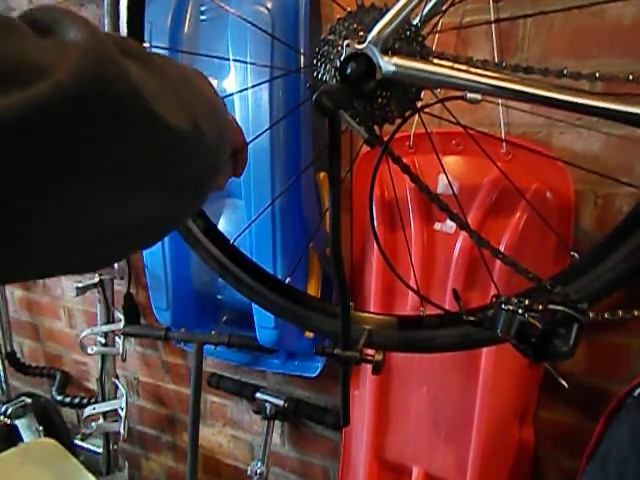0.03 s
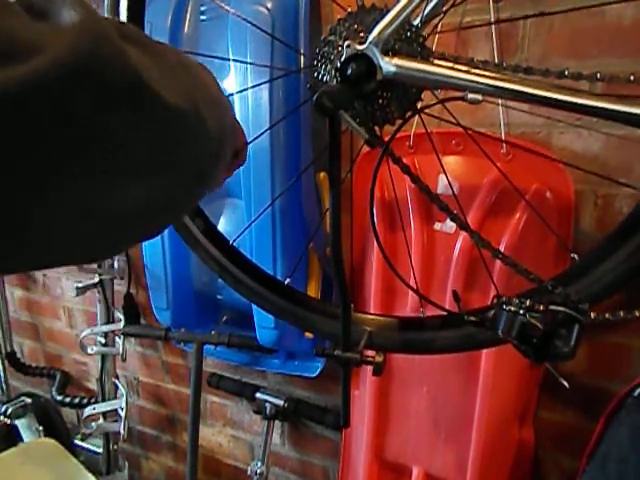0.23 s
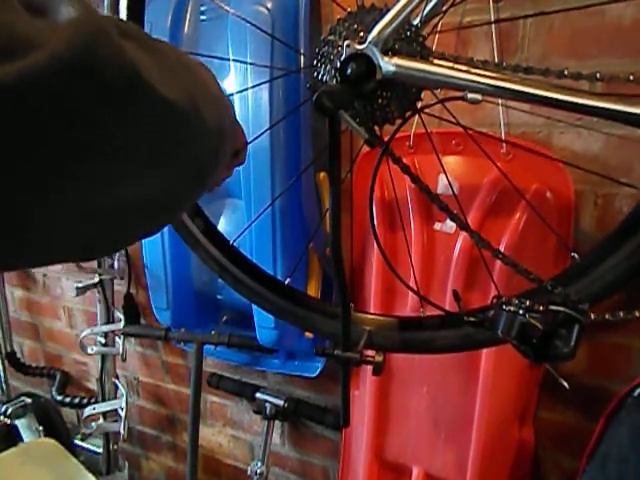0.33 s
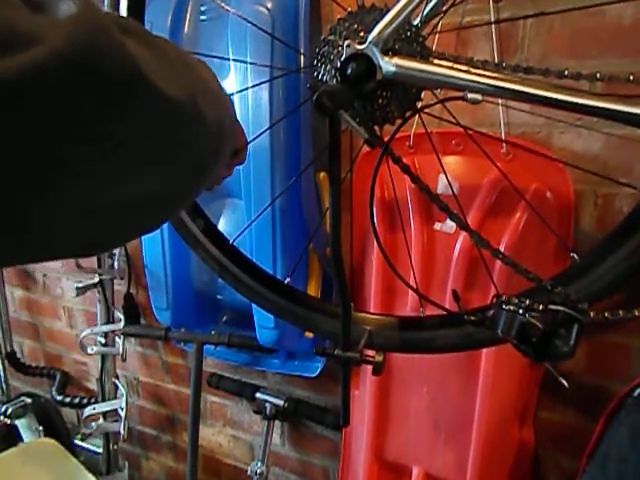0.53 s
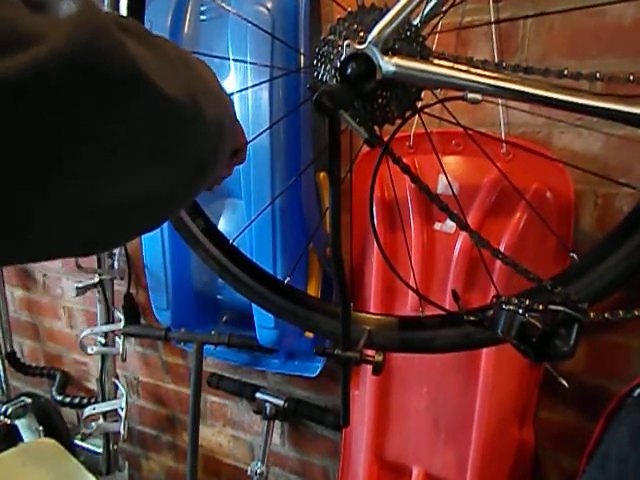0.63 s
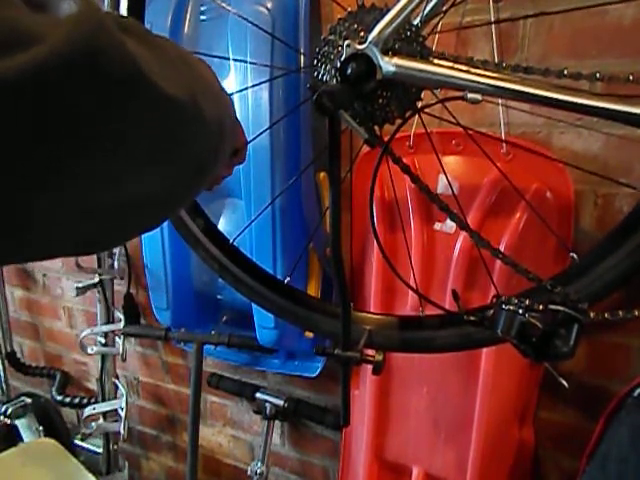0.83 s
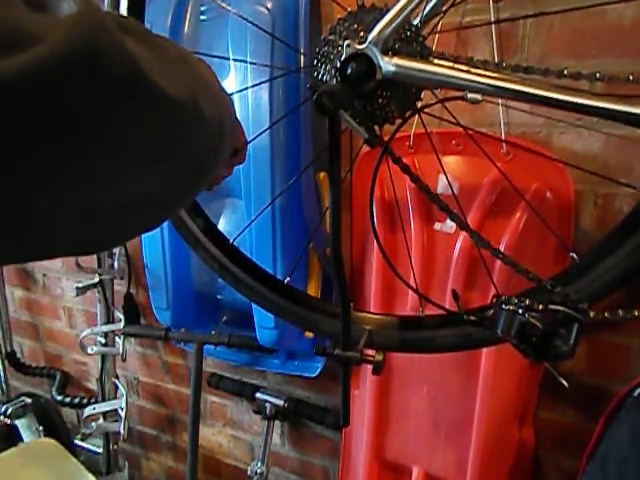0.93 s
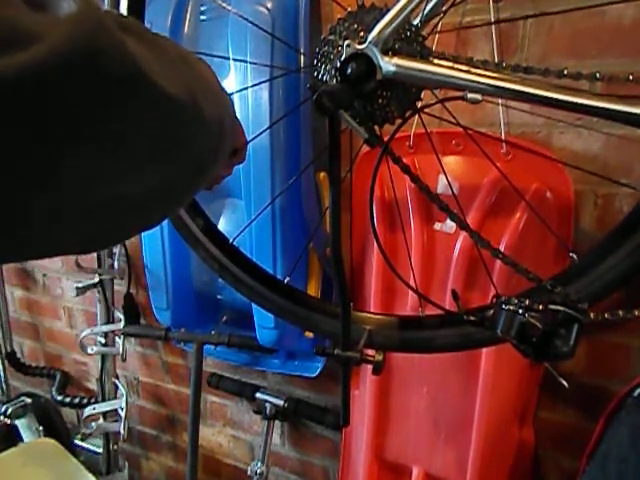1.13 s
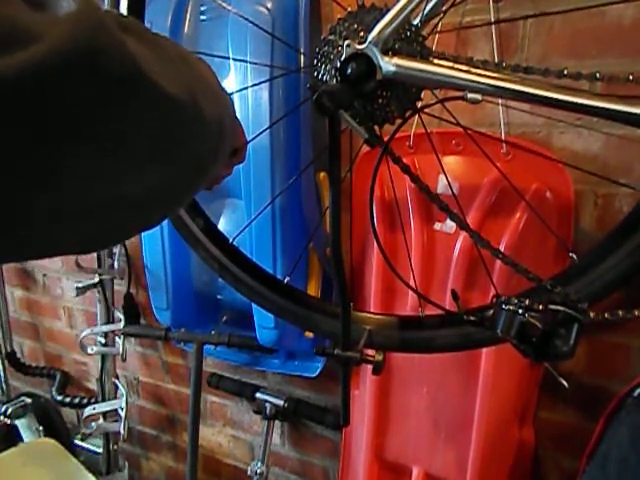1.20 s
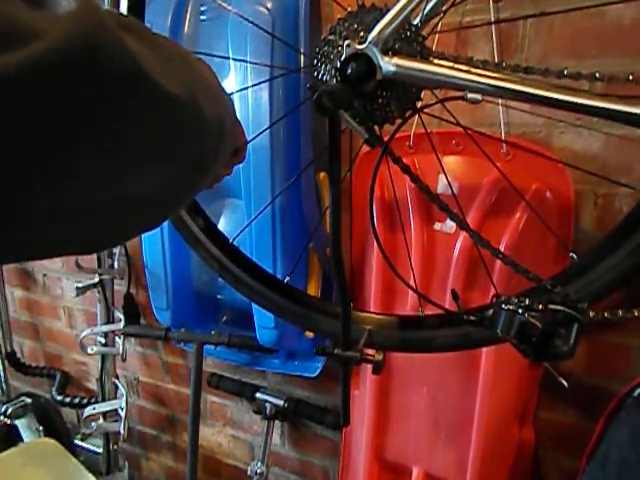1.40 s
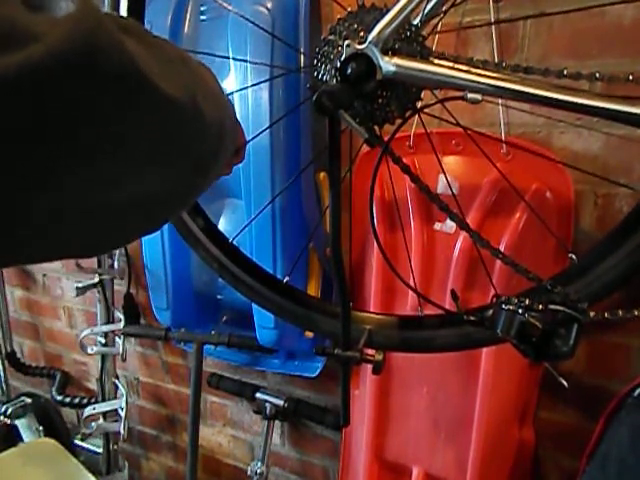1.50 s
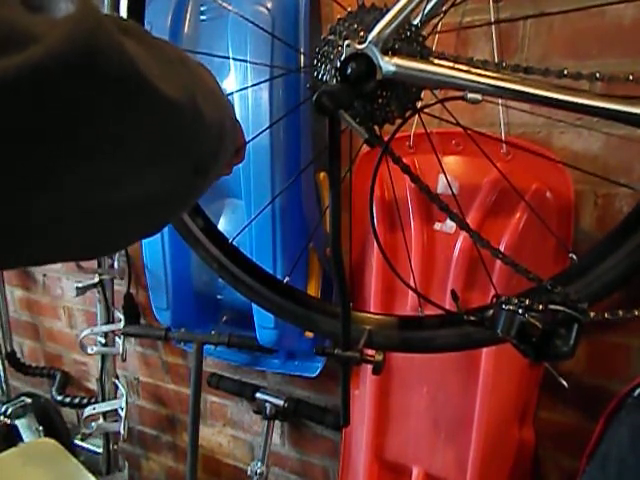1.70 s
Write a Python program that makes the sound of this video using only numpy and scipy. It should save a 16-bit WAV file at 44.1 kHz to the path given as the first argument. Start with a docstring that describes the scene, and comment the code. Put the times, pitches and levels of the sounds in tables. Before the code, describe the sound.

A sharp snap and a softer tick from bicycle wheel spokes in a quiet workshop.

```python
"""In a small brick workshop, bicycle spokes are worked by hand: one hard snap, then a lighter slip.
Each sudden release of stiff steel radiates a crack and short ticks, and excites the wheel's damped modes.
The walls return discrete echoes and a diffuse tail; faint handling rubs swell over a steady hiss.
A narrow-band microphone loses the treble and just overloads on the first snap."""
import sys
import numpy as np
from scipy import signal
from scipy.fft import rfft, irfft
from scipy.io import wavfile

SR = 44100
rng = np.random.default_rng(int(sys.argv[2]) if len(sys.argv) > 2 else 0)


def master(y):
    """Save y as 16-bit WAV."""
    cut = np.clip(np.atleast_2d(y).T, -1, 1)
    pcm = np.round(cut * 32767)  # scale
    wavfile.write(sys.argv[1], SR, pcm.astype(np.int16))


N = 77175


def amp(db):
    """Amplitude ratio of a level in decibels."""
    return 10 ** (np.asarray(db) / 20)


def level_at(spectrum, hz):
    """Level in dB, interpolated on a logarithmic frequency axis."""
    points_hz, db = np.transpose(spectrum)
    return np.interp(np.log(hz + 1), np.log(points_hz + 1), db)


def bins():
    """Frequencies in Hz of a full-length spectrum."""
    return np.fft.rfftfreq(N, 1 / SR)


def since(start):
    """Time in seconds, counted from the start."""
    return np.arange(N) / SR - start


def bell(x):
    """Gaussian curve of height 1."""
    return np.exp(-.5 * x ** 2)


def decay(t, t60):
    """Exponential damping: a fall of 60 dB in t60 seconds."""
    return np.exp(-np.log(1000) * t / t60)


def noise(gain):
    """Spectral shaping: white noise weighted by frequency, then scaled to rms 1."""
    shaped = irfft(rfft(rng.standard_normal(N)) * gain, N)
    return shaped / np.sqrt(np.mean(shaped ** 2) + 1e-20)


# Background spectrum. Each row: frequency in Hz, relative spectral density in dB.
HISS_SPECTRUM = [(20, -10), (60, -8.5), (150, -11), (260, -6.5), (420, -8), (560, -4.5), (880, -1),
                 (1150, -3), (1500, -3), (2400, -6.5), (2900, -5), (3500, -8), (5000, -9), (5500, -16),
                 (6000, -15)]


def hiss(db=-48.5):
    """Stationary noise: room air and the microphone set a steady floor."""
    return amp(db) * noise(amp(level_at(HISS_SPECTRUM, bins())))


# Spectrum of metal slipping on metal. Each row: frequency in Hz, relative level in dB.
CRACK_SPECTRUM = [(200, -14), (700, -11), (1000, -3), (1400, -3.5), (1900, -0.5), (2500, -4), (3300, 3.5),
                  (4500, 11), (6000, 7)]


def crack(start, db, low_hz):
    """Stick-slip release: a brief broadband burst, rolled off below low_hz."""
    t = since(start)
    low_cut = (1 - bell(bins() / low_hz)) ** 2
    burst = noise(amp(level_at(CRACK_SPECTRUM, bins())) * low_cut)
    return amp(db) * burst * (t > 0) * decay(abs(t), t60=0.019)


# The spoke's main band, stressed by a hard snap. Each row: frequency in Hz, gain in dB at full focus.
SNAP_BAND = [(200, -7.5), (900, -5.5), (1900, -6), (2700, -2), (3400, 1.5), (4050, 5), (4600, -3),
             (5400, -9), (6000, -10)]
# Modes of spokes, rim and sprockets. Each row: frequency in Hz, relative level in dB, t60 in seconds.
WHEEL_MODES = [(1395, -15.5, 0.17), (1884, -4.5, .2), (2094, -10.5, 0.57), (2402, -2.5, 0.25),
               (2703, -2, 0.25), (3280, -12, 0.14), (3352, -3.5, 0.2), (3370, -10, 0.36),
               (3805, -5.5, 0.38), (4050, -3, .19), (4220, 1, 0.16), (4500, 3.5, 0.18), (4660, -5.5, .17),
               (5370, -6, 0.22)]


def wheel_ring(start, db, focus):
    """Free vibration: after a click the wheel rings as a sum of damped modes."""
    t = np.maximum(since(start), 0)
    ring = np.zeros(N)
    for (hz, mode_db, t60), phase in zip(WHEEL_MODES, rng.random(len(WHEEL_MODES))):
        gain = amp(mode_db + focus * level_at(SNAP_BAND, hz))
        ring += gain * decay(t, t60) * np.sin(2 * np.pi * (hz * t + phase))
    return amp(db) * ring * (t > 0)


# Spectrum of a light slip. Each row: frequency in Hz, relative level in dB.
SLIP_SPECTRUM = [(200, -49.5), (700, -47), (1100, -21), (1500, -10), (2000, -14), (2600, -3), (3400, -2),
                 (4500, 0), (5200, -5), (6000, -8.5)]


def room_tail(start, db, build_s, t60, focus):
    """Reverberation: dense reflections merge into noise that builds up and dies away."""
    t = np.maximum(since(start), 0)
    colour = amp(level_at(SLIP_SPECTRUM, bins()) + focus * level_at(SNAP_BAND, bins()))
    build_up = 1 - np.exp(-t / build_s)
    return amp(db) * noise(colour) * build_up * decay(t, t60)


def pulse(start, db, hz, half_s):
    """Wave packet: a brief tone under a Gaussian envelope that peaks at start."""
    t = since(start)
    return amp(db) * bell(t / half_s) * np.cos(2 * np.pi * hz * t)


# The knock on the rim. One row: time in seconds, peak level in dB, pitch in Hz.
RIM_KNOCK = (0.2379, -20, 1560)


def rim_knock():
    """Impact: the hard snap jolts the rim into one lower-pitched pulse."""
    return pulse(*RIM_KNOCK, half_s=.0003)


# Direct sound of the spokes. Each row: time in seconds, peak in dB, pitch in Hz, half length in seconds.
SPOKE_TICKS = [(0.2381, -1.5, 4380, 0.00032), (1.1954, -13, 4140, 0.00011), (1.1963, -19, 3650, 0.00017),
               (1.1972, -18, 4330, 0.00045), (1.1984, -18, 4930, 0.0002), (1.1996, -15.5, 4640, 0.00054)]


def spoke_ticks():
    """Elastic release: stiff steel swings for a few cycles as a spoke lets go."""
    return sum(pulse(*row) for row in SPOKE_TICKS)


# Echoes from nearby walls. Each row: delay in seconds, relative level in dB, pitch in Hz.
WALL_ECHOES = [(.0079, -22, 3900), (.0092, -4, 3700), (.0113, -1.5, 4000), (.0138, -15.5, 3800),
               (0.0243, -3.5, 4100), (.025, -8, 3900), (.0665, -21, 4000)]


def wall_echoes(start, db):
    """Early reflection: each path returns the click as a pulse, delayed by its travel time."""
    return sum(pulse(start + delay, db + wall_db, hz, half_s=.0004) for delay, wall_db, hz in WALL_ECHOES)


# Handling rubs. Each row: time in seconds, level in dB, pitch in Hz, half length in seconds,
# width in octaves.
RUBS = [(0.413, -52.5, 600, 0.029, 0.62), (0.888, -60.5, 787, 0.098, .2), (1.545, -52, 933, 0.019, 0.12)]


def rub(peak_s, db, hz, half_s, octaves):
    """Friction: handling the wheel makes a soft swell of band-limited noise."""
    band = bell(np.log2((bins() + 1) / hz) / octaves)
    return amp(db) * bell(since(peak_s) / half_s) * noise(band)


# The snap and the slip. Each row: start in seconds, crack level in dB, crack low cut in Hz,
# ring and tail levels in dB, tail build-up and t60 in seconds, echo level in dB,
# focus on the spoke's main band from 0 to 1.
CLICKS = [(0.2373, -15.5, 705, -30, -14, 0.0052, 0.24, -5.5, 1.0),
          (1.1950, -24, 1300, -38.5, -28.5, 0.00055, 0.2, -28, 0.36)]


def scene():
    """Superposition: background, direct sound and reflections add in one channel."""
    mix = hiss() + sum(rub(*row) for row in RUBS) + rim_knock() + spoke_ticks()
    for start, crack_db, low_hz, ring_db, tail_db, build_s, t60, echo_db, focus in CLICKS:
        mix += crack(start, crack_db, low_hz) + wheel_ring(start, ring_db, focus)
        mix += room_tail(start, tail_db, build_s, t60, focus) + wall_echoes(start, echo_db)
    return mix[None]


def record(dry):
    """Band limiting and clipping: the microphone loses the treble and flattens the highest peak."""
    top_hz, slope_hz, overload, edge_hz = 5776, 520, 0.74, 16600
    response = 1 / (1 + np.exp(np.clip(4 * (bins() - top_hz) / slope_hz, -20, 20)))
    clipped = np.clip(irfft(rfft(dry) * response, N), -overload, overload)
    low_pass = signal.firwin(511, edge_hz, window=("kaiser", 9), fs=SR)
    return signal.oaconvolve(clipped, low_pass[None], "same")


dry = scene()
out = record(dry)
master(out)
```